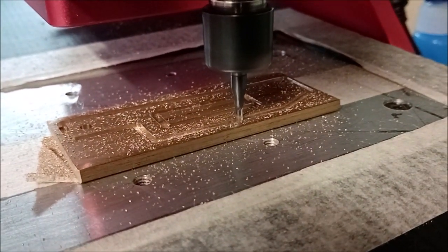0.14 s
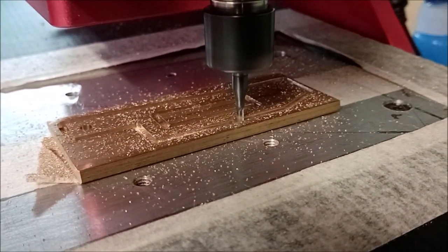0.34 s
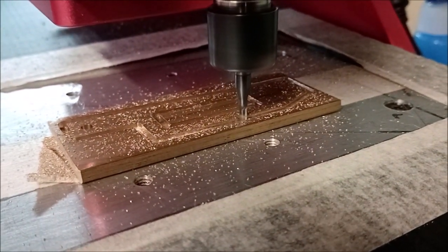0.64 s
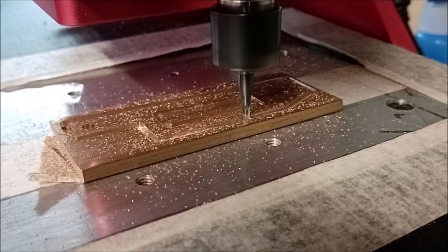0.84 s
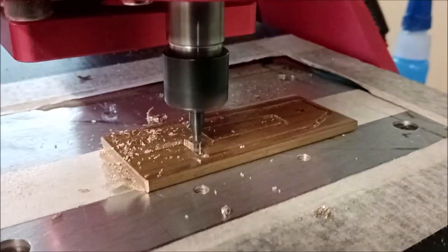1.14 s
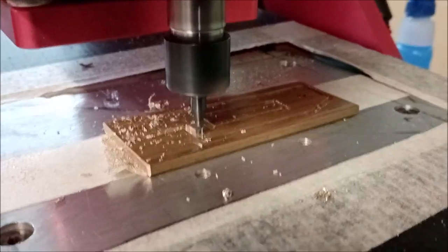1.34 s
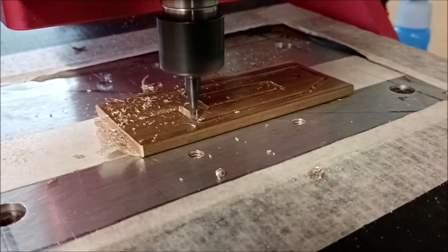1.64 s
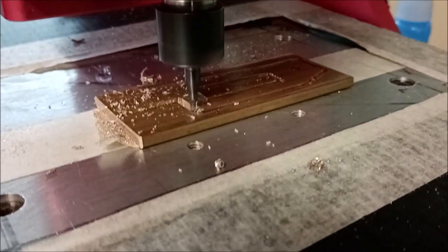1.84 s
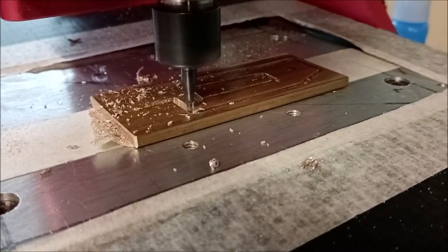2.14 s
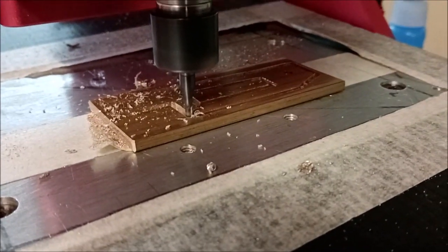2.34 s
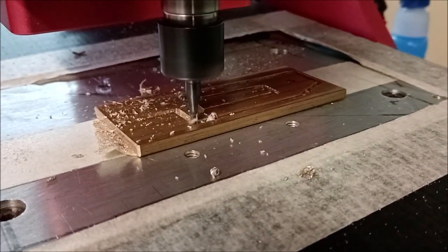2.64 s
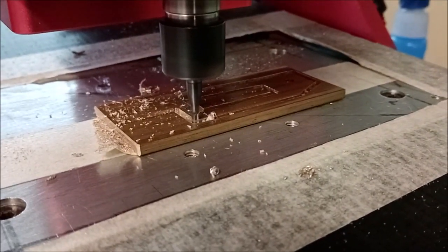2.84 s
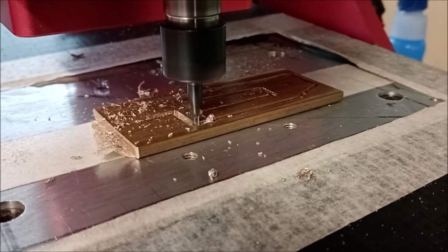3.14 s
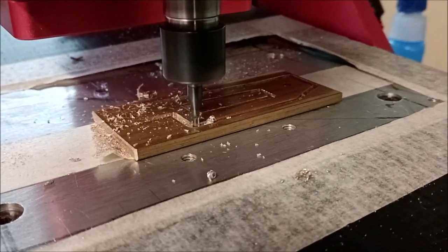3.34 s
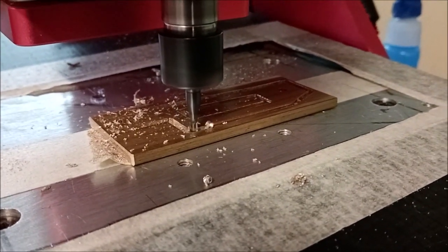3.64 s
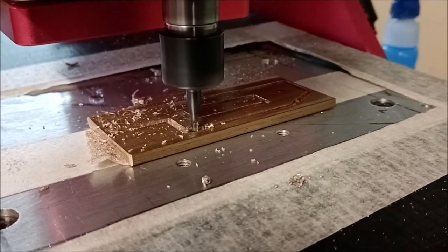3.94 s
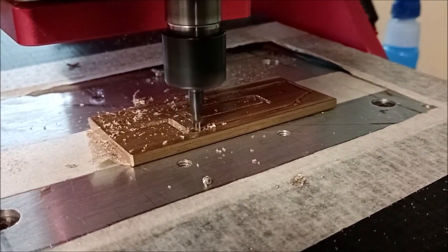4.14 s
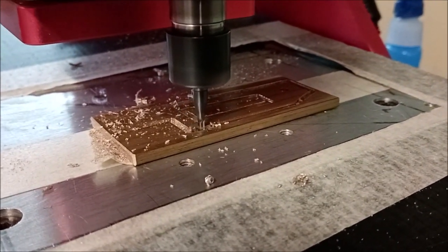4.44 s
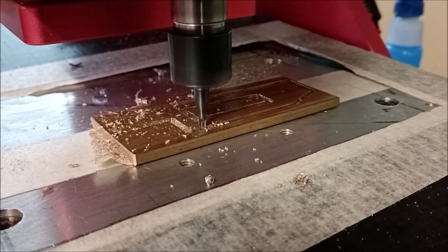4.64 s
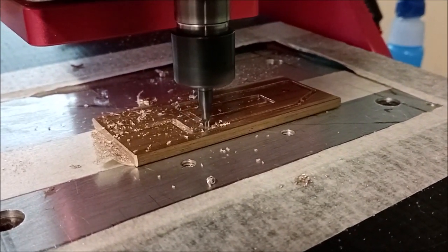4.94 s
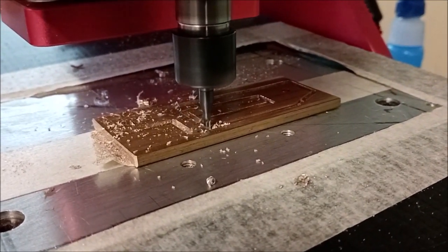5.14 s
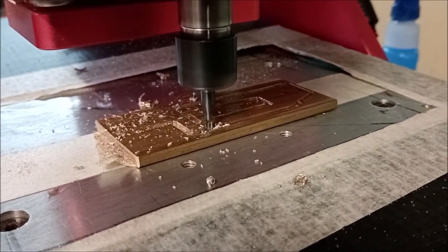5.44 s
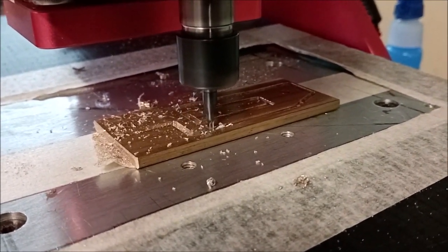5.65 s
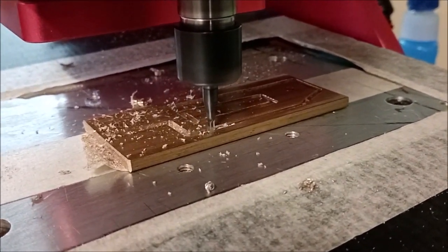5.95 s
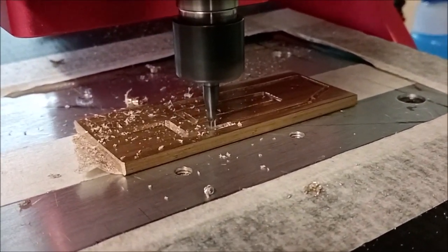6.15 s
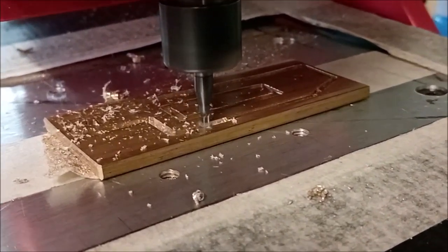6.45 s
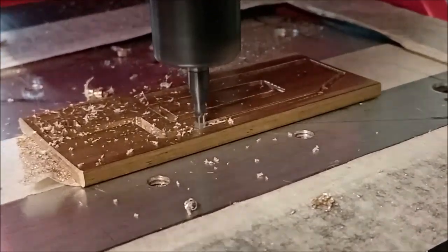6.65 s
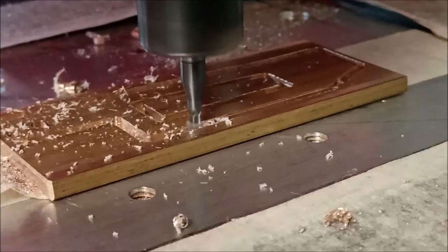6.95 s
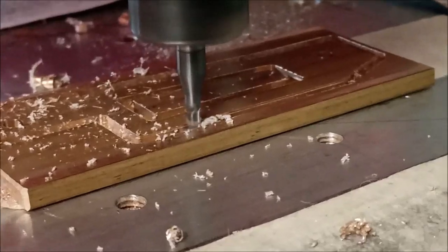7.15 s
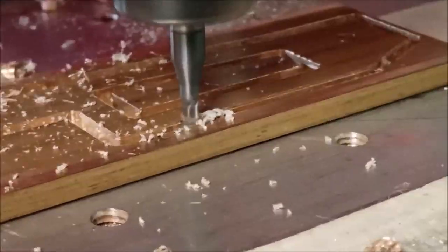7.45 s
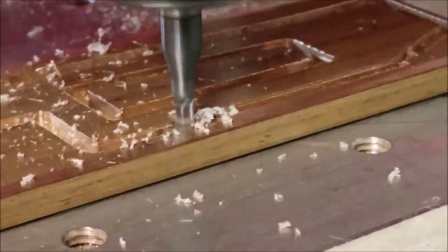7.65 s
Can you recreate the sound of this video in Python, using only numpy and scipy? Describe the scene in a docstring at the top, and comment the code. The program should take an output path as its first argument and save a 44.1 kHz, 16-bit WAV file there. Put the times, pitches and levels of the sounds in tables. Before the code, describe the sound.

Close-up metal engraving: loud buzzing grind and bright whine break off at one second, then a softer, even milling drone continues to the end.

```python
"""A small CNC engraver mills a brass plate, heard from close by in two passes with a short silence between.
First a coarse, deepening cut, breaking off abruptly: noise with a pattern repeating every three turns,
coloured as grinding and hiss. Then a lighter cut fades in, rounds a corner, travels along the plate and eases.
In both, sines locked to the spindle (about 10000 rpm) hum and whine beside feed motor, belt and frame tones."""
import sys
import numpy as np
from scipy import signal
from scipy.fft import rfft, irfft
from scipy.io import wavfile

SR = 44100
rng = np.random.default_rng(int(sys.argv[2]) if len(sys.argv) > 2 else 0)


def store_wav(level_fs):
    """Save 16-bit WAV to argv[1]."""
    pcm = np.round(np.clip(np.atleast_2d(level_fs), -1, 1) * 32767)
    wavfile.write(sys.argv[1], SR, pcm.T.astype(np.int16))


N = 343962
T = np.arange(N) / SR
HZ = np.maximum(np.arange(N // 2 + 1) * SR / N, 1)
TURNS_PER_CYCLE = 3


def from_db(db):
    """Decibels to amplitude gain."""
    return 10 ** (np.asarray(db) / 20)


def rms_one(x):
    """Scale to rms 1."""
    return x / np.sqrt(np.mean(x ** 2) + 1e-20)


def in_time(rows):
    """Each column of a curve table at every sample."""
    s, *columns = np.transpose(rows)
    return [np.interp(T, s, c) for c in columns]


def over_hz(rows):
    """Each column of a spectrum table at every frequency, interpolated over log frequency."""
    hz, *columns = np.transpose(rows)
    return np.array([np.interp(np.log(HZ), np.log(hz), c) for c in columns])


def move(middle_s, takes_s):
    """Progress of a steady move, from 0 before it to 1 after it."""
    return np.clip((T - middle_s) / takes_s + 1 / 2, 0, 1)


def between(before, after, progress):
    """A value carried along by a move."""
    return before + (after - before) * progress


def drift(rate_hz):
    """Slow random signal of rms 1: white noise through a double pole at rate_hz."""
    step = 40  # samples between drawn points
    warm_up = 2000
    pole = np.exp(-2 * np.pi * rate_hz * step / SR)
    white = rng.standard_normal(N // step + 2 + warm_up)
    slow = signal.lfilter([1], [1, -2 * pole, pole * pole], white)[warm_up:]
    return np.interp(np.arange(N) / step, np.arange(len(slow)), rms_one(slow))


def tone(angle_rad, level_db, pan_db, lead_rad):
    """A sine placed between left and right, its mean power kept."""
    sides = rms_one(from_db([[pan_db / 2], [-pan_db / 2]]))
    angle_rad = (angle_rad % (2 * np.pi)).astype(np.float32)
    left_right = np.array([np.sin(angle_rad + np.float32(lead_rad)), np.sin(angle_rad)])
    return np.sqrt(2) * from_db(level_db) * sides * left_right


def belt_and_frame(tones, flutter_db, wander_rad):
    """Weak, unsteady tones of belt and frame that keep their own pitch."""
    out = np.zeros((2, N))
    for pitch_hz, level_db, pan_db in tones:
        angle_rad = 2 * np.pi * pitch_hz * T + wander_rad * drift(4.3)
        out += tone(angle_rad, level_db + flutter_db * drift(7.9), pan_db, pitch_hz / 900)
    return out


def motor(turns, orders, swell_db_of, flutter_db, shake_turns, wander_rad):
    """Sines locked to a shaft; the load shakes the shaft angle, which roughens the high orders most."""
    shaken = turns + shake_turns * drift(25)
    out = np.zeros((2, N))
    for multiple, order_db, pan_db, lead_rad in orders:
        k = round(multiple)
        level_db = order_db + swell_db_of.get(k, 0) + flutter_db * drift(10.2)
        angle_rad = 2 * np.pi * (k * shaken + rng.random()) + wander_rad * drift(6.8)
        out += tone(angle_rad, level_db, pan_db, lead_rad)
    return out


def feed(orders, swell_db_of, flutter_db):
    """The stepper that moves the tool sings at multiples of its step rate, less steadily than the spindle."""
    step_hz = 380.9
    return motor(step_hz * T, orders, swell_db_of, flutter_db, shake_turns=0.0059, wander_rad=0.54)


def spindle(turns, orders, swell_db_of, flutter_db, shake_turns):
    """The spindle holds its speed closely, so its lines are clean and waver only a little."""
    return motor(turns, orders, swell_db_of, flutter_db, shake_turns, wander_rad=0.18)


def cutting_force(turns, repeat_db, turn_lines_db, spread_db):
    """White friction noise plus a pattern that returns every cycle; what repeats every turn is stronger."""
    size = int(TURNS_PER_CYCLE * N / turns[-1])  # samples per cycle
    shape = (2, size // 2 + 1)
    phases = np.exp(2j * np.pi * rng.random(shape))
    lines = phases * from_db(spread_db * rng.uniform(-1.1, 1, shape))
    lines[:, ::TURNS_PER_CYCLE] *= from_db(turn_lines_db)
    lines[:, :TURNS_PER_CYCLE * 26:TURNS_PER_CYCLE] = 0  # low orders belong to the spindle's own whine
    pattern = rms_one(irfft(lines, size * 8))  # 8x oversampled
    place = (turns / TURNS_PER_CYCLE % 1 * pattern.shape[1]).astype(int)
    return from_db(repeat_db) * pattern[:, place] + rng.standard_normal((2, N))


def bite(turns, turn_db, cycle_db, rough_db):
    """Strength of the cut: a swing per turn, a swing per three-turn cycle, and chance from chip to chip."""
    cycle = np.cos(2 * np.pi * turns / TURNS_PER_CYCLE)
    stroke = np.cos(2 * np.pi * turns) * (1 + cycle / 2)
    return rms_one(from_db(turn_db * stroke + cycle_db * cycle + rough_db * drift(140)))


def colour(force, spectrum, band):
    """Two noises become left and right of given spectrum; phase lags on the right make the left lead."""
    # likeness of the noise at the two ears: pitch_hz, likeness_0_to_1
    likeness = [(40, .3), (120, 0.28), (500, 0.62), (900, 0.65), (1200, 0.26), (2000, 0.53), (2500, 0),
                (4000, 0.23), (8000, 0), (15000, 0.05)]
    # left's lead, from reflections in the machine: pitch_hz, lead_rad
    left_lead = [(150, 0), (500, .2), (920, .7), (1200, 2.5), (1480, 2.4), (1700, 4.7), (2000, 6.2),
                 (2300, 6.2), (2700, 7.9), (3150, 5.5), (3500, 3.3), (5300, 6.3), (8500, 4.2), (15000, 3.5)]
    mid, side = rfft(force)
    alike = np.clip(over_hz(likeness)[0], 0, 1)
    pair = np.sqrt((1 + alike) / 2) * mid + np.sqrt((1 - alike) / 2) * side * [[1], [-1]]
    pair[1] *= np.exp(-1j * over_hz(left_lead)[0])
    return irfft(pair * from_db(over_hz(spectrum)) * band, N) * np.sqrt(SR / 2)


def snagging():
    """The edge snags on thicker chips and grinds louder for a moment: Gaussian swells, in dB."""
    # middle_s, rise_db, half_length_s
    snags = [(0.096, 3, .011), (0.6, 0.5, 0.01), (0.708, 2.5, .03), (1.61, 4, 0.011), (2.582, 3, .035),
             (4.963, 3.0, 0.016), (7.074, 2.2, .025)]
    return sum(rise_db * np.exp(-np.minimum(((T - middle_s) / half_s) ** 2, 20))
               for middle_s, rise_db, half_s in snags)


def cutter(turns, grind, hiss, grind_db, hiss_db, hiss_pan_db, grind_repeat_db, hiss_repeat_db,
           turn_db, cycle_db, surge_db):
    """The cut shakes plate and frame below a crossover and hisses at the edge above it."""
    low = 1 / (1 + (HZ / 4400) ** 24)
    above_rumble = HZ ** 2 / (HZ ** 2 + 20 ** 2)
    body = cutting_force(turns, grind_repeat_db, turn_lines_db=1.5, spread_db=5.5)
    body = body * bite(turns, turn_db, cycle_db, rough_db=1.05)
    edge = cutting_force(turns, hiss_repeat_db, turn_lines_db=4.0, spread_db=3.0)
    edge = edge * bite(turns + 1 / 2, turn_db, cycle_db, rough_db=0.87)  # half a turn ahead
    grind_gain = from_db(grind_db + snagging() + surge_db * drift(24))
    grinding = grind_gain * colour(body, grind, np.sqrt(low) * above_rumble)
    sides = from_db(hiss_pan_db / 2 * np.array([[1], [-1]]))
    hissing = from_db(hiss_db) * sides * colour(edge, hiss, np.sqrt(1 - low))
    return grinding + hissing


def first_pass(turns):
    """A coarser cut that deepens as it goes: loud grinding and a bright whine near 8 kHz."""
    # levels are ahead of the gains below; pan is left minus right
    # spindle: multiple_of_turning_rate, level_db, pan_db, left_lead_rad
    spindle_orders = [(1.0, -36.9, 13.0, -0.2), (2, -48, 8, 1.7), (5.0, -46.4, 5.2, 0.1), (6, -41, -8, 0.8),
                      (10.0, -32.9, 0.6, -1.8), (19.0, -34.3, -4.7, -1.8), (20.0, -34.0, 15.6, 2.2),
                      (21.0, -46.8, -14.2, -1.2), (24.0, -53.4, 0.6, 2.7), (25.0, -40.8, -1.6, 2.4),
                      (30.0, -54.5, 1.6, -0.5), (35.0, -52.7, -16.4, -1.3), (38.0, -50.2, -8.3, 2.9),
                      (39.0, -48.9, -20.6, -2.5), (40.0, -49.9, -16.8, -2.6), (45.0, -53.6, 2.4, 2.3),
                      (49.0, -49.1, 24.3, -2.1), (50.0, -38.4, 19.1, 2.0), (51.0, -45.0, 21.0, 2.8),
                      (52.0, -46.7, 16.0, 2.1), (60.0, -51.4, -3.7, 1.8), (62.0, -55.4, 15.3, -1.3),
                      (90.0, -47.0, -1.7, -1.8)]
    # feed motor: multiple_of_step_rate, level_db, pan_db, left_lead_rad
    feed_orders = [(1, -42, 6, .3), (3, -38, 3, 1.8), (7, -48, -5, 1.7), (8, -49, -9, -1.8),
                   (15, -55, -12, 0)]
    # belt and frame: pitch_hz, level_db, pan_db
    tones = [(104.4, -54.5, 14), (221.3, -46, 2), (279, -52.5, 13), (433, -47, 6), (496, -41.5, 8),
             (3150, -45, -7), (3370, -43, 2), (3320, -47, -11), (8400, -47, 7)]
    # noise radiated by plate and frame: pitch_hz, left_db_per_hz, right_db_per_hz
    grind = [(40.0, -90, -97.8), (75.0, -74, -79), (110.0, -63.5, -71.5), (200.0, -65, -64.5),
             (302, -65, -71.5), (516, -52.5, -58.5), (880, -60.5, -62), (1050, -58.5, -51),
             (1250.0, -56, -65), (1460, -53.5, -56), (2390, -68.5, -69.5), (3200.0, -66, -63.5),
             (3830, -66.5, -65.5), (4670, -76, -77)]
    # noise of the cutting edge: pitch_hz, left_db_per_hz, right_db_per_hz
    hiss = [(4000.0, -82, -97), (5100, -75.5, -70.5), (6350, -72, -65), (7030, -69.5, -65.5),
            (7830, -68, -92), (8700, -60, -71.0), (9450, -68.5, -77), (10100.0, -67, -76),
            (11400.0, -73.5, -75), (12500.0, -72, -73.5), (13900.0, -75, -79), (14500, -69, -67.5),
            (15700.0, -68, -69)]
    # spindle orders that rise or sink as the cut deepens: multiple_of_turning_rate, slope_db_per_s
    deepening_orders = [(2, 15), (10, 2.0), (19, -4)]
    mid_pass_s, deepening_db_per_s = 0.41, 3
    since_middle_s = np.minimum(T - mid_pass_s, mid_pass_s)
    cut = cutter(turns, grind, hiss, grind_db=deepening_db_per_s * since_middle_s,
                 hiss_db=-0.5, hiss_pan_db=0.5, grind_repeat_db=-9.5, hiss_repeat_db=-8.5,
                 turn_db=0.5, cycle_db=0.8, surge_db=0.9)
    swell_db_of = {round(k): db_per_s * since_middle_s for k, db_per_s in deepening_orders}
    whine = spindle(turns, spindle_orders, swell_db_of, flutter_db=1.5, shake_turns=0.0009)
    feed_tone = from_db(1.0) * feed(feed_orders, {}, flutter_db=1.0)
    frame_tone = belt_and_frame(tones, flutter_db=1.5, wander_rad=0.96)
    return from_db(-0.37) * cut + whine + feed_tone + frame_tone


def second_pass(turns):
    """A lighter, even cut under the spindle's hum and whine: round a corner, along the plate, then easing."""
    # levels are ahead of the gains below; pan is left minus right
    # spindle: multiple_of_turning_rate, level_db, pan_db, left_lead_rad
    spindle_orders = [(1.0, -35.3, 10.8, 0.1), (2.0, -43.7, 12.2, 0.8), (5.0, -41.9, -0.5, 0.6),
                      (6.0, -47.2, -3.7, 1.0), (8.0, -46.9, 18.7, 3.0), (10.0, -34.0, -2.4, -1.5),
                      (19.0, -37.8, -6.3, 0.1), (20.0, -36.0, 8.7, -2.1), (21.0, -40.7, -16.0, -2.2),
                      (22.0, -49.6, -2.3, 2.8), (24.0, -54.7, 0.9, 0.9), (25.0, -41.8, 14.1, -0.5),
                      (28.0, -52.6, -9.9, -1.3), (32.0, -57.4, -5.1, 1.2), (33.0, -57.5, -6.3, 2.6),
                      (35.0, -52.1, -15.2, 0.7), (38.0, -52.0, -12.1, -2.5), (43.0, -58.3, 8.6, 2.8),
                      (45.0, -54.9, 24.1, -1.2), (46.0, -58.8, 17.5, -0.7), (49.0, -52.6, 14.4, -2.6),
                      (50.0, -52.1, 3.7, -1.3), (51.0, -57.6, 11.0, -1.4), (52.0, -56.9, 6.8, -1.7),
                      (54.0, -54.1, 8.2, 3.0), (60.0, -51.6, 9.6, 2.9), (90.0, -51.9, 2.1, 2.5)]
    # feed motor: multiple_of_step_rate, level_db, pan_db, left_lead_rad
    feed_orders = [(1, -42.5, 9, .3), (3, -40, 0, 2.5), (7, -45, 5, 1.3), (8, -49, 0, 1), (15, -53, -9, .6),
                   (16, -55, -9, -2.6)]
    # belt and frame: pitch_hz, level_db, pan_db
    tones = [(104.2, -55.5, 15), (133.7, -53.5, 15), (222.7, -55, 5), (276.5, -54, 17), (1435, -49, 0),
             (2750, -58, 0), (2900, -63, -7), (3320, -47, 0), (3300, -46, -5.5), (3387, -59, 12)]
    # noise radiated by plate and frame: pitch_hz, left_db_per_hz, right_db_per_hz
    grind = [(40.0, -90, -97.5), (75.0, -76.5, -85), (111, -66, -71.5), (200.0, -68, -70.5),
             (300.0, -65, -71), (465, -62.5, -66.7), (850, -68, -67.5), (1030, -61.5, -60),
             (1230, -63, -66.5), (1450, -59.5, -63), (2230, -72, -71.5), (3270, -64.5, -65),
             (3670, -69, -69), (4760, -75, -70.5)]
    # noise of the cutting edge: pitch_hz, left_db_per_hz, right_db_per_hz
    hiss = [(4000, -61, -60), (4630, -78.5, -76.5), (6630, -74, -70.5), (6800, -74, -74), (7840, -73, -96),
            (8700.0, -71, -76), (9440, -69.5, -77.4), (10140, -72, -73.5), (11360, -81.5, -75),
            (12500.0, -75, -76.5), (13900.0, -75, -81), (14660, -69.5, -66), (15700.0, -71, -69.5)]
    # hum, used only as swing about its mean: time_s, level_db
    hum_curve = [(1.42, -37), (3.81, -38.5), (4.88, -43), (5.42, -38), (7.05, -42.5), (7.1, -39)]
    # the corner changes the feed motor's tone: multiple_of_step_rate, before_db, after_db
    corner_orders = [(1, -5.5, -1.2), (3, 3, -1)]
    # travel changes the whine's balance: multiple_of_turning_rate, before_db, after_db
    travel_orders = [(2, -2.1, 0.7), (19, -1.9, 0.5), (20, 2, -3.3), (50, 2.5, -9)]
    corner = move(middle_s=2.84, takes_s=0.33)
    travel = move(middle_s=4.1, takes_s=2.7)
    ease = move(middle_s=7.15, takes_s=0.23)
    # hiss grows and drifts to the right during travel
    cut = cutter(turns, grind, hiss, grind_db=0.18 - 0.3 * ease,
                 hiss_db=between(-0.8, 0.5, travel), hiss_pan_db=between(1.7, -0.6, travel),
                 grind_repeat_db=-10.5, hiss_repeat_db=-10.0, turn_db=0.0, cycle_db=-0.2, surge_db=0.76)
    hum_db, = in_time(hum_curve)
    spindle_swell_db = {round(k): between(before, after, travel) for k, before, after in travel_orders}
    spindle_swell_db[1] = hum_db - hum_db.mean()
    feed_swell_db = {round(k): between(before, after, corner) for k, before, after in corner_orders}
    whine = spindle(turns, spindle_orders, spindle_swell_db, flutter_db=0.8, shake_turns=0.00097)
    whine = from_db(-0.67 - 1.3 * ease) * whine
    feed_tone = feed(feed_orders, feed_swell_db, flutter_db=1.4)
    frame_tone = belt_and_frame(tones, flutter_db=2.5, wander_rad=0.93)
    return from_db(-0.52) * cut + whine + feed_tone + frame_tone


def scene():
    """The first pass breaks off, the second fades in; one governed spindle hunts a little around its rate."""
    # time_s, gain_db
    fade_first = [(1.039, 0), (1.044, -21), (1.061, -26), (1.068, -54), (1.11, -68), (1.13, -100)]
    # time_s, gain_db
    fade_second = [(1.09, -100), (1.133, -47), (1.145, -23), (1.18, -12.5), (1.25, -6), (1.33, -2),
                   (1.41, 1)]
    spindle_hz, hunt_hz, hunts_per_s = 166.55, 0.08, 1.0
    turns = np.cumsum(spindle_hz + hunt_hz * drift(hunts_per_s)) / SR
    first = from_db(in_time(fade_first)) * first_pass(turns)
    second = from_db(in_time(fade_second)) * second_pass(turns)
    return first + second


def record(dry):
    """Steep elliptic low-pass over the whole sound."""
    cutoff_hz, ripple_db, stop_db = 15750, 0.1, 70
    return signal.sosfilt(signal.ellip(12, ripple_db, stop_db, cutoff_hz, fs=SR, output="sos"), dry)


dry = scene()
out = record(dry)
store_wav(out)
```